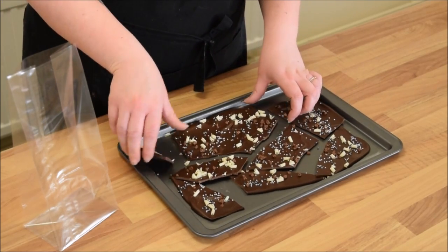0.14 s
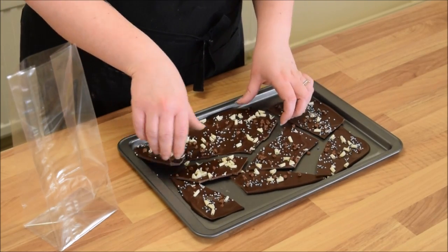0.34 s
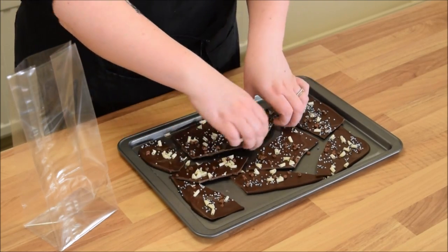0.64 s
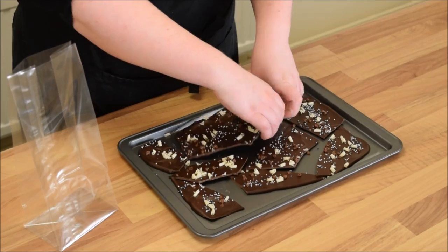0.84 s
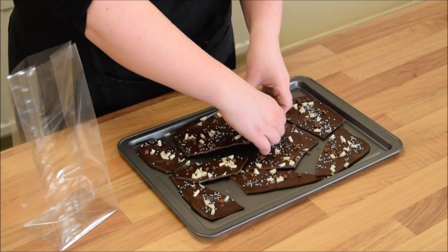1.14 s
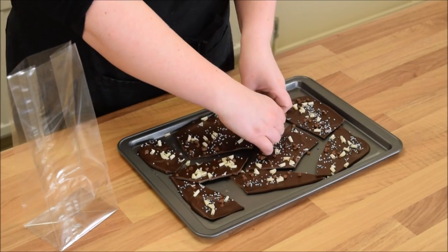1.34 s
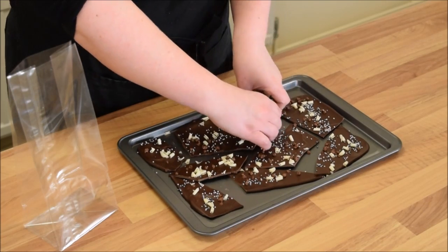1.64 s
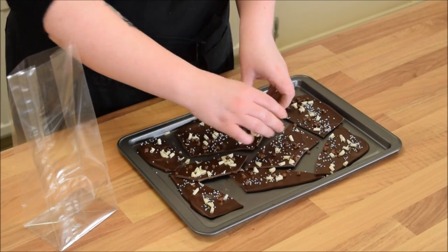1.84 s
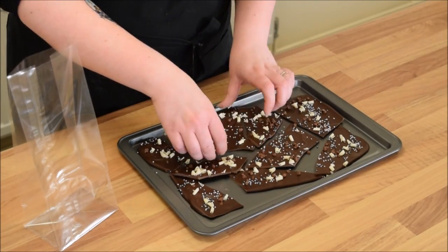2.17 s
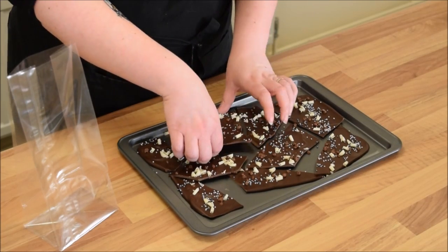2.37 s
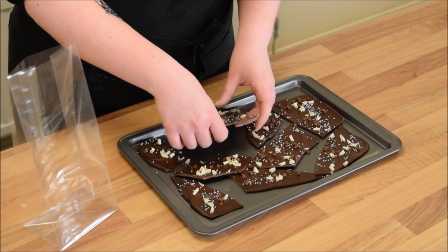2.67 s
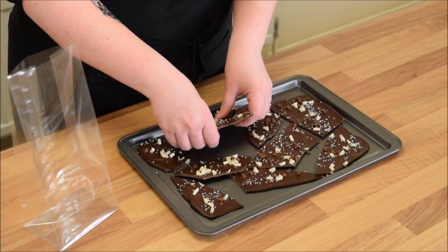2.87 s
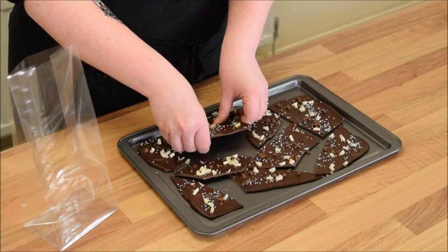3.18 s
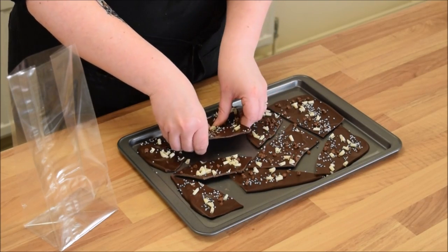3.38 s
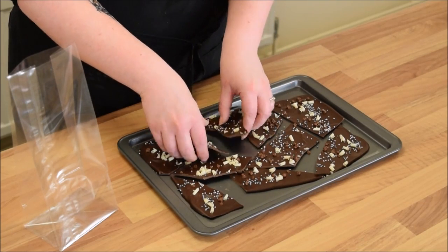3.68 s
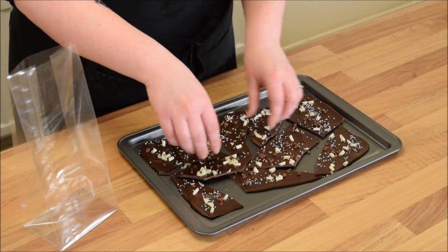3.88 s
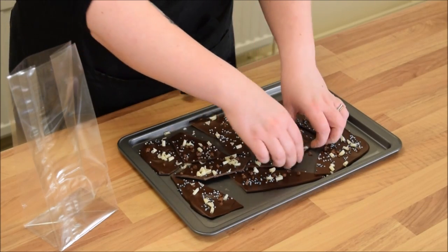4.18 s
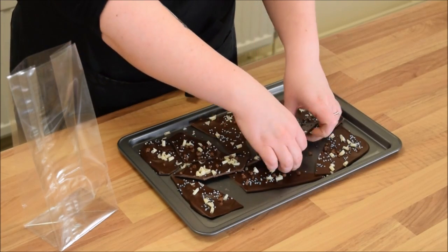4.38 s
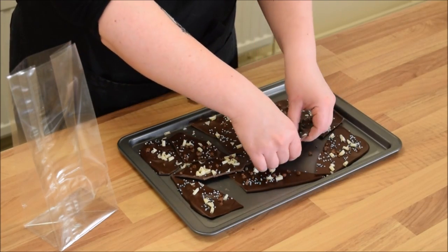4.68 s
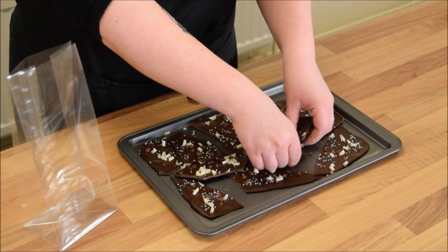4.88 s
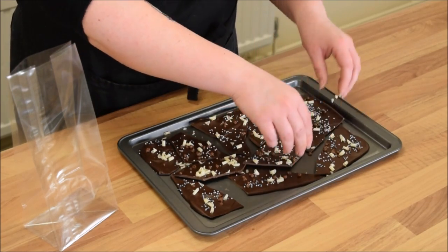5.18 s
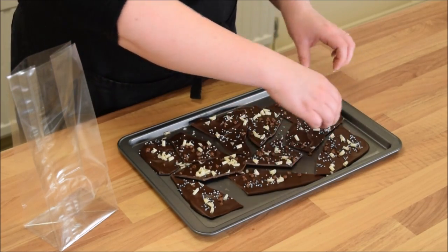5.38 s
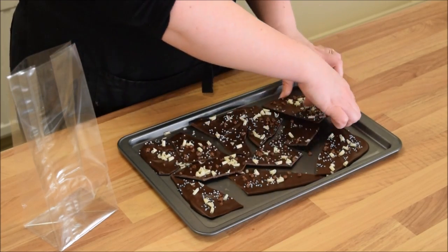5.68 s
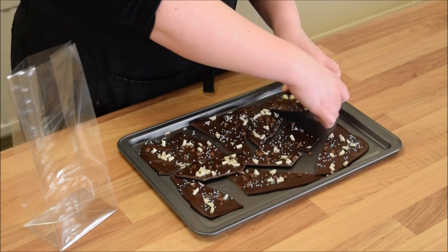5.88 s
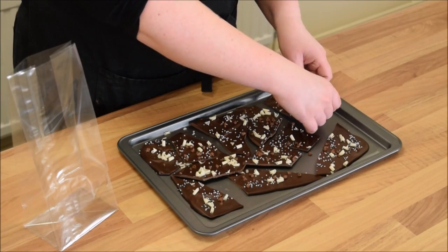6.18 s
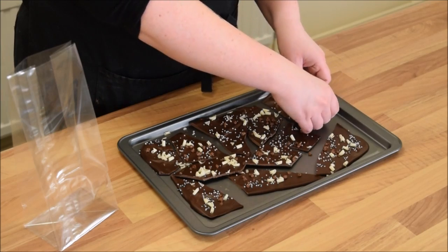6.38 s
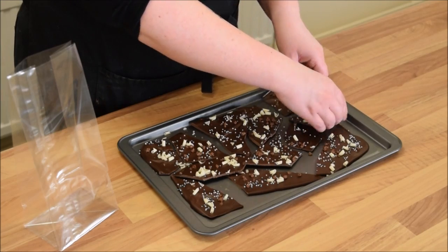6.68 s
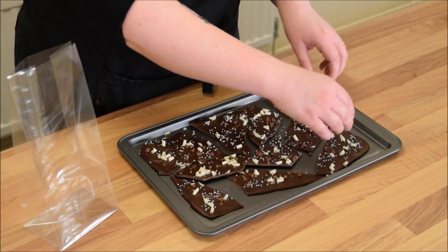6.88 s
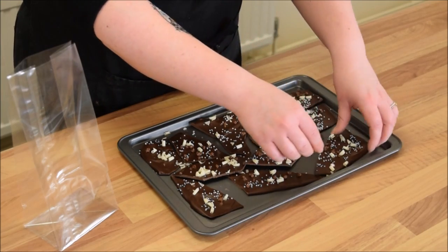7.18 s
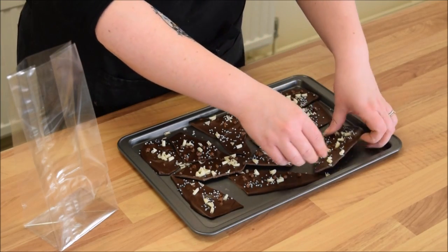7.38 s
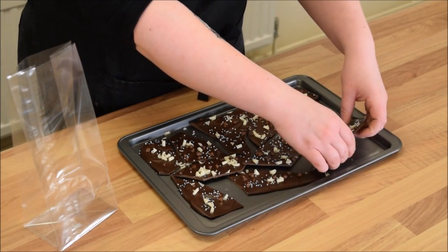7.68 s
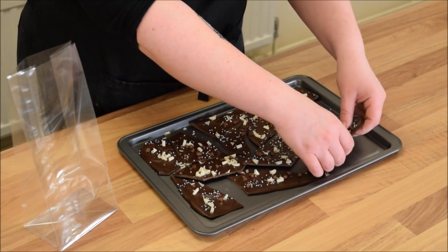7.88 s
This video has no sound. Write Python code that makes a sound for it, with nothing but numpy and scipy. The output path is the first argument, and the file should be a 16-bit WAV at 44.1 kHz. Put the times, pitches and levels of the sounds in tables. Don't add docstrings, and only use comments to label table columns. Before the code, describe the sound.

Hard brittle chocolate pieces snap, clack and knock on a thin metal baking tray in uneven bursts, with crumbs scraping, in a small kitchen.

```python
import sys
import numpy as np
from scipy import signal
from scipy.fft import rfft, irfft
from scipy.io import wavfile

SR = 44100
rng = np.random.default_rng(int(sys.argv[2]) if len(sys.argv) > 2 else 0)


def store_pcm(level_fs):
    pcm = np.round(np.clip(level_fs, -1, 1) * 32767).astype(np.int16)
    wavfile.write(sys.argv[1], SR, np.atleast_2d(pcm).T)


def convert_level_to_amplitude(level_db):
    exponent = np.asarray(level_db, float) / 20
    return 10 ** exponent


N = 354123
RING = 8192


def rms_one(x):
    return x / np.sqrt(np.mean(x ** 2) + 1e-20)


def colour(x, points):
    hz = np.fft.rfftfreq(N, 1 / SR) + 1
    point_hz, point_db = np.transpose(points)
    level_db = np.interp(np.log(hz), np.log(point_hz), point_db)
    return irfft(rfft(x) * convert_level_to_amplitude(level_db), N)


def drift(rate):
    knots = rng.standard_normal(int(N / SR * rate) + 2)
    return np.interp(np.arange(N) / SR * rate, np.arange(len(knots)), knots)


def resonance(f, hz, q):
    return 1 / (1 + 1j * q * (f / hz - hz / f))


def tray_modes(table, events, scatter_db):
    hz, level_db, t60 = np.transpose(table)[:, :, None]
    t = np.arange(RING) / SR
    rings = convert_level_to_amplitude(level_db - 60 * t / t60) * np.sin(2 * np.pi * hz * t)
    strength, sign = rng.standard_normal((2, events, len(table)))
    return rfft((convert_level_to_amplitude(scatter_db * strength) * np.sign(sign)) @ rings)


def all_contacts():
    # start_s, peak_db, thud_db, crack_db, pitch_hz
    snaps = [(0.0572, -28, -13.5, -28, 1980), (0.2651, -10, -21.5, -38, 1970),
             (0.3465, -10.5, -24, -30, 2340), (0.4774, -18.5, -23, -48, 1880),
             (1.5809, -17, -20.5, -34, 3240), (1.5906, -11, -25, -16, 1680),
             (1.9536, -19.5, -16, -29, 2880), (1.9570, -12, -16.5, -31, 1637),
             (2.888, -24.5, -16, -17, 2600), (2.8946, -21.5, -45, -21, 1270), (3.4598, -17, -16, -12, 1590),
             (4.7422, -20.5, -27, -29, 1575), (5.7875, -21, -24, -26, 1700),
             (6.4772, -17, -23, -16.5, 2010), (6.8456, -11.5, -22, -46.5, 1642),
             (6.8953, -18, -26, -33, 1850), (7.48, -28, -31.5, -37, 2400)]
    # start_s, peak_db, thud_db, crack_db, pitch_hz
    drops = [(0.016, -22.5, -44, -28, 1850), (4.9370, -31, -24.5, -29, 2400),
             (3.7885, -18.5, -20, -16, 2280), (5.043, -17.5, -18.5, -27.5, 2050),
             (5.070, -30.5, -8, -39.5, 1470), (5.087, -29.5, -12, -32, 1220), (5.7503, -14, -23, -24, 1900),
             (6.662, -19, -23, -23.5, 1800), (6.7665, -20.5, -17, -39, 1880), (6.8056, -25, -19, -12, 4400),
             (6.9224, -20.5, -20, -19.5, 2780)]
    # start_s, peak_db, crack_db, pitch_hz
    knocks = [(0.0884, -26, -30, 1850), (0.1104, -35, -12, 1960), (0.2439, -40, -27.5, 2670),
              (0.5023, -23, -21.5, 1160), (0.5726, -35, -31, 1300), (0.9178, -32.5, -20.5, 1225),
              (1.2516, -39.5, -28, 2140), (1.277, -43, -26, 2220), (1.3745, -42, -12, 1760),
              (1.7913, -33, -29, 1840), (1.9817, -44, -40, 1550), (2.2079, -26, -31, 1147),
              (2.3785, -31.5, -40, 1900), (2.4763, -35, -28, 1140), (3.8274, -27.5, -31.5, 1640),
              (3.8691, -26, -19, 1750), (3.9122, -38.5, -42, 1550), (4.5925, -44, -10.5, 2270),
              (4.7354, -31.5, -23, 2410), (5.7674, -22, -16, 2110), (6.6923, -31, -18, 3140),
              (6.8259, -36, -29.5, 1120), (7.5353, -31.5, -27, 1778), (7.5582, -32.5, -26, 1680),
              (7.7112, -38.5, -24, 1219)]
    # start_s, peak_db, crack_db, pitch_hz
    ticks = [(0.0054, -35, -24, 3160), (0.6646, -28, -28, 2470), (0.885, -49.5, -4.5, 2600),
             (1.0742, -41, -15, 2300), (1.1549, -38, -24, 2180), (1.4798, -42, -21, 1240),
             (1.7402, -23.5, -21.5, 1760), (2.232, -21.5, -54.5, 1940), (2.3549, -30.5, -24, 1130),
             (3.1643, -26.5, -24, 3050), (3.7335, -34, -23, 3100), (4.0981, -32, -15, 2250),
             (4.181, -38.5, -11, 2260), (4.4202, -29, -15, 2200), (5.2773, -31.5, -12.5, 3480),
             (5.7403, -29, -38, 2300), (7.244, -32.5, -15, 2210), (7.3394, -21.5, -36, 4770),
             (7.355, -27, -26.5, 2000)]
    # start_s, peak_db, crack_db, crumble_ms
    scuffs = [(0.1337, -29.5, -20, 6.5), (0.2206, -44, -24, 22.6), (0.414, -25.5, -23, 15),
              (0.9062, -39.5, -36, 15), (1.366, -39, -30, 5.6), (2.265, -34, -22, 6),
              (2.4685, -36.5, -31, 10.6), (2.5291, -44, -12, 16), (3.6300, -27.5, -23, 21),
              (3.6925, -36, -8.5, 16), (3.7673, -27.5, -33, 25), (3.8138, -23.5, -34, 6),
              (4.077, -49, -25.5, 14), (4.156, -33, -22, 16), (4.2341, -39, -17, 5.3),
              (4.3965, -32.5, -34, 16), (4.9196, -35, -17, 4.8), (5.6181, -36.5, -27, 22),
              (5.6354, -36, -28, 6.4), (5.6627, -40, -23, 17.5), (6.0082, -48.5, -10, 6.5),
              (6.597, -51, -6, 7.7), (6.6267, -37, -29, 6.6), (6.646, -29, -11, 6),
              (7.323, -40.5, -36, 6.2), (7.3755, -39, -30.5, 11), (7.4027, -33.5, -31, 22),
              (7.4353, -32, -32, 12), (7.4505, -31, -22, 25), (7.6917, -36, -33, 9.4)]
    knock_thud_db, tick_thud_db, scuff_thud_db = -15.5, -27, -15
    snap_ms, drop_ms, knock_ms, tick_ms = 3.28, 5, 5, 1.42
    flat_piece_hz = 1640
    rows = [(*row, snap_ms) for row in snaps]
    rows += [(*row, drop_ms) for row in drops]
    rows += [(s, db, knock_thud_db, crack, hz, knock_ms) for s, db, crack, hz in knocks]
    rows += [(s, db, tick_thud_db, crack, hz, tick_ms) for s, db, crack, hz in ticks]
    rows += [(s, db, scuff_thud_db, crack, flat_piece_hz, ms) for s, db, crack, ms in scuffs]
    return rows


def contacts():
    # pitch_hz, level_db, t60_s (time to fall 60 dB)
    tray_low = [(256.6, -11.5, 0.6), (320, -30.5, 0.083), (384.5, 16.5, 0.0728), (427, 10, 0.06),
                (574, -17.5, 0.024), (693.4, 17.5, 0.12), (766, 25.5, 0.025), (877, 16, 0.068)]
    # pitch_hz, level_db, t60_s
    tray_high = [(1030, 3, 0.06), (1228, 2, 0.06), (1530, 2, 0.05), (1680, 3, 0.06), (1780, 1, 0.05),
                 (1994, 3, 0.05), (2277, 4, 0.045), (2610, 0, 0.04), (2850, 2, 0.035), (3140, 5, 0.033),
                 (3980, 0, 0.027), (4320, -3, 0.027)]
    tail = {"thud": (0.22, -42, 0.4, -26), "body": (0.044, -34.5, 0.31, -14.5),
            "crack": (0.0655, -40.5, 0.4, -7.5)}
    s, peak_db, thud_db, crack_db, hz, crumble_ms = np.transpose(all_contacts())[:, :, None]
    count = len(s)
    t, f = np.arange(RING) / SR, np.fft.rfftfreq(RING, 1 / SR) + 1
    grit, burst, scatter_mid, scatter_side = rng.standard_normal((4, count, RING))

    age = 1000 * t / np.clip(crumble_ms, .2, 20)
    crumble = (1 - np.exp(-3.0 * age)) * np.exp(-age)
    drive = grit * convert_level_to_amplitude(7.4 * burst - 19.0) * crumble
    drive[:, 0] += np.exp(-crumble_ms[:, 0] / 6.7)
    strength = np.sqrt(np.sum(drive ** 2, axis=1, keepdims=True))
    build = strength * (1 - np.exp(-t / 0.000087)) * (1 - np.exp(-2.5 * age))
    rattle = convert_level_to_amplitude(3.5 * np.repeat(burst[:, :RING // 32], 32, axis=1))

    def strike(response, layer):
        clutter_t60, room_db, room_t60, side_db = tail[layer]
        clutter = rattle * convert_level_to_amplitude(-30.5 - 60 * t / clutter_t60)
        room = convert_level_to_amplitude(room_db - 60 * t / room_t60)
        fade = build * (clutter + room)
        mid = irfft(rfft(drive + scatter_mid * fade) * response)
        side = irfft(rfft(scatter_side * fade) * response) * convert_level_to_amplitude(side_db)
        return np.array([mid + side, mid - side]) / np.abs(mid).max(axis=1, keepdims=True)

    piece = resonance(f, hz, 2.19) * resonance(f, hz, 0.24)
    piece = piece + convert_level_to_amplitude(-11.0) * resonance(f, 1330, 0.68) * resonance(f, 3230, 1.0)
    body = piece + convert_level_to_amplitude(-56) * tray_modes(tray_high, count, scatter_db=3)
    sheet = resonance(f, 600, .8) + convert_level_to_amplitude(-53) * tray_modes(tray_low, count, scatter_db=3)
    thud = resonance(f, 450, .5) * sheet
    crack = resonance(f, 8000, 1.35) * resonance(f, 11500, 0.9)

    sound = strike(body, "body")
    sound += convert_level_to_amplitude(thud_db + 4.0) * strike(thud, "thud")
    sound -= convert_level_to_amplitude(crack_db + 12.5) * strike(crack, "crack")
    out = np.zeros((2, N + RING))
    for k, at in enumerate((s[:, 0] * SR).astype(int)):
        out[:, at:at + RING] += convert_level_to_amplitude(peak_db[k] - 2.5) * sound[:, k]
    return out[:, :N]


def dying_tones(rows, gain_db, rise_s, t60_at):
    t, out = np.arange(RING) / SR, np.zeros(N + RING)
    for k, (s, db, hz) in enumerate(rows):
        at = int(s * SR)
        envelope = convert_level_to_amplitude(db + gain_db - 60 * t / t60_at(hz)) * (1 - np.exp(-t / rise_s))
        out[at:at + RING] += (-1) ** k * envelope * np.sin(2 * np.pi * hz * t)
    return out[:N]


def pieces_ringing():
    # start_s,
    # peak_db, pitch_hz
    blow_tones = [(0.0575, -31.5, 2290), (0.2649, -27, 4040), (0.2649, -23.5, 4390), (0.2649, -35, 1260),
                  (0.2649, -33, 2615), (0.2649, -34.5, 2254), (0.2649, -25, 2010), (0.3462, -31, 1188),
                  (0.3462, -27, 2578), (0.3462, -27, 1950), (0.3462, -20, 2280), (0.413, -35.5, 1033),
                  (0.413, -30.5, 2240), (0.4777, -32, 1628), (0.4777, -30, 1946), (1.581, -41.5, 4660),
                  (1.581, -30.5, 1473), (1.581, -35.5, 3112), (1.581, -37.5, 2304), (1.581, -33, 4000),
                  (1.581, -32.5, 1780), (1.5905, -31, 4813), (1.5905, -33, 4337), (1.5905, -33, 2830),
                  (1.5905, -29, 3930), (1.5905, -29, 2403), (1.5905, -24, 3150), (1.5905, -32, 1416),
                  (1.5905, -28.5, 1750), (1.9535, -30, 3900), (1.9535, -30, 1040), (1.9535, -26, 2270),
                  (1.9535, -26, 3110), (1.9535, -19.5, 2872), (1.9535, -25, 1556), (2.8878, -39, 1990),
                  (2.8955, -38.5, 1980), (2.8955, -33, 2260), (2.8955, -34, 1206), (3.46, -33, 2870),
                  (3.7887, -35, 4360), (3.7887, -32.5, 1289), (3.827, -42, 1244), (3.827, -38, 1459),
                  (3.827, -30.5, 1651), (5.0426, -33, 1071), (5.75, -39, 4400), (5.75, -40, 1050),
                  (5.75, -44, 3710), (5.75, -30.5, 1810), (5.75, -24.5, 2120), (6.661, -34.5, 1071),
                  (6.661, -37.5, 2840), (6.8456, -33.5, 2729), (6.8456, -28.5, 1100),
                  (6.8456, -27.5, 2235), (6.8456, -31, 1880), (6.895, -39.5, 2820), (6.895, -41, 1740),
                  (6.9215, -35, 3323),
                  (0.0154, -39, 3110), (0.0151, -40, 1690), (0.0147, -37, 1035), (0.063, -37, 2607),
                   (0.0575, -36, 1953), (0.413, -36, 1970), (0.4777, -36, 4000), (0.4774, -35, 4023),
                   (0.4777, -38, 3310), (1.581, -38.5, 3720), (1.739, -36.5, 2900), (1.738, -38, 1658),
                   (1.9535, -30, 4100), (2.8878, -43, 2500), (2.8878, -41, 3300), (3.46, -34, 3387),
                   (3.7887, -45, 3300), (3.7887, -37.5, 4200), (3.7887, -35, 2080), (3.7884, -33.5, 3176),
                   (4.743, -36, 3180), (4.742, -45, 2920), (5.0426, -46, 2100), (5.0438, -34, 2626),
                   (5.043, -33, 3250), (5.0434, -37, 1650), (5.7877, -40.5, 3900), (6.478, -40, 1100),
                   (6.478, -38, 1700), (6.475, -40, 2198), (6.661, -35.5, 3443), (6.661, -38, 3180),
                   (6.661, -32, 2017), (6.8456, -32, 4780), (6.894, -40, 1095), (6.9215, -40, 1108),
                   (6.9215, -38, 2880)]
    # start_s, peak_db,
    # pitch_hz
    chips = [(0.0082, -42.5, 2900), (0.011, -43, 1720), (0.0612, -18.5, 2370), (0.0648, -32.5, 2240),
             (0.0889, -31, 3190), (0.265, -3.5, 2330), (0.2948, -29.5, 2240), (0.302, -25, 2200),
             (0.3169, -31, 2200), (0.3525, -14, 2260), (0.3582, -23.5, 1590), (0.5095, -22, 1850),
             (0.5757, -29, 1670), (1.5813, -18, 3400), (1.5921, -21, 1870), (1.6029, -32.5, 1720),
             (1.6104, -22, 1670), (5.755, -16, 2100), (1.6365, -28.5, 1590), (1.6454, -32, 2280),
             (1.7479, -36.5, 2240), (1.9642, -30.5, 1550), (1.9842, -21.5, 1450), (1.9911, -30.5, 1810),
             (4.102, -33, 2200), (7.2475, -32, 2500), (2.2344, -28.5, 2100), (4.4235, -29, 2300),
             (2.3609, -31, 1770), (2.3779, -35, 2580), (2.9008, -25, 1590), (2.9048, -27, 1530),
             (2.9077, -34.5, 2370), (3.4665, -27.5, 1740), (3.4789, -31, 1980), (4.4035, -35, 2500),
             (3.8043, -25, 2630), (3.706, -34, 3000), (3.8451, -41, 1890), (3.8722, -40, 2020),
             (4.9197, -43, 2450), (5.0492, -17, 1990), (5.7409, -33.5, 2710), (5.7706, -30.5, 2070),
             (5.7823, -31, 2110), (5.7887, -23, 2630), (5.8057, -31.5, 1160), (6.6759, -19.5, 1720),
             (6.6898, -22, 1850), (6.777, -21, 2020), (6.8086, -29.5, 4310), (6.8265, -24, 1520),
             (6.8956, -21, 1900), (6.8988, -22, 3000), (6.9132, -25, 1940), (6.916, -26, 1980),
             (6.9202, -35, 2330), (7.3404, -17.5, 5470), (7.4032, -31, 2500), (7.4059, -28, 2500),
             (0.0195, -25, 1360), (0.422, -28, 2200), (0.2652, -18, 1310), (0.372, -24, 1120),
                 (0.5114, -32, 4110), (1.5807, -25.5, 1690), (1.5902, -25, 1690), (1.632, -41.5, 4390),
                 (1.7617, -46, 3880), (1.9838, -40.5, 3320), (2.4711, -37, 750), (2.887, -31.5, 1055),
                 (2.8965, -19, 1280), (3.167, -33, 1370), (3.6415, -30, 3000), (3.6473, -32, 3300),
                 (3.694, -32, 3600), (3.8031, -33.5, 3750), (5.0746, -28.5, 1160), (5.1236, -36, 1100),
                 (5.77, -34, 3510), (5.7828, -26, 1030), (5.7883, -27, 3620), (6.4772, -20, 4000),
                 (6.481, -24, 4300), (6.5024, -36.5, 4130), (6.645, -41, 1100), (6.6478, -40.5, 4390),
                 (6.6893, -39.5, 3340), (6.7861, -37.5, 4050), (6.9158, -32, 4440), (6.9229, -29.5, 3320),
                 (6.9316, -30, 3490), (6.9416, -33.5, 4010), (7.34, -30, 5660), (7.3558, -32, 4950),
                 (7.4627, -45.0, 4130),
             (0.573, -27, 1300),
        (1.5906, -14, 3600),
        (1.9572, -13, 2430),
        (6.4746, -20, 1800),
        (6.849, -13, 2100),
    ]

    def tone_t60(hz):
        return 0.093 * (2000 / hz) ** 0.74

    def chip_t60(hz):
        return 7 / hz

    tones = dying_tones(blow_tones, -1, 0.00065, tone_t60)
    clicks = dying_tones(chips, 0.5, 0.00008, chip_t60)
    return tones + clicks


def tray_rings():
    # start_s, peak_db, pitch_hz
    drop_rings = [(0.057, -25.5, 910), (0.145, -27.5, 620.4), (0.266, -20, 843), (0.347, -22, 853),
                  (0.412, -32, 905), (0.477, -26, 872), (0.502, -33, 862), (1.589, -34.5, 715),
                  (1.955, -41, 718), (1.981, -38.5, 377.3), (2.23, -33, 743.6), (2.475, -37.5, 745),
                  (3.46, -21.5, 685), (3.635, -25, 713), (3.828, -30, 877), (4.742, -31.5, 571.6),
                  (3.633, -31.5, 333.6), (5.751, -38, 908), (6.477, -51, 890), (6.661, -24.5, 750),
                  (6.846, -32, 730), (6.922, -35, 894), (7.447, -33, 394), (7.479, -32.5, 693)]
    # start_s, peak_db
    flexes = [(0.091, -56), (0.135, -39.5), (0.262, -42.5), (0.344, -42), (0.419, -58), (0.501, -55),
              (1.954, -45), (2.899, -51), (3.47, -45), (3.787, -59), (5.043, -65), (6.301, -53),
              (6.845, -65)]
    ring_t60_s, sheet_t60_s = 0.0933, 0.63
    sheet_hz = 256.6
    rows = [(*row, ring_t60_s) for row in drop_rings]
    rows += [(s, db, sheet_hz, sheet_t60_s) for s, db in flexes]
    t, out = np.arange(RING * 2) / SR, np.zeros(N + RING * 2)
    for s, db, hz, t60 in rows:
        at = int(s * SR)
        envelope = convert_level_to_amplitude(db - 8.5 - 60 * t / t60) * (1 - np.exp(-t / 0.0028))
        out[at:at + len(t)] += envelope * np.sin(2 * np.pi * hz * t)
    return out[:N]


def slide():
    # start_s, length_s, level_db
    strokes = [(0.0, 0.15, -54), (0.441, 0.021, -55), (0.742, 0.149, -68), (1.791, 0.0126, -59),
               (2.477, 0.048, -64), (3.657, 0.221, -58), (3.947, 0.344, -69.5), (4.99, 0.077, -57),
               (5.198, 0.33, -69), (5.562, 0.383, -63.5), (6.006, 0.15, -68), (6.47, 0.213, -62.5),
               (6.797, 0.13, -50.5), (7.145, 0.19, -66.5), (7.394, 0.045, -63.5), (7.7, 0.25, -70.5)]
    # pitch_hz, level_db (per Hz)
    crumb_colour = [(300, 3.5), (900, 6.5), (2000, 3.5), (4000, -4.5), (6000, -15.5), (9000, -10),
                    (15000, -49)]
    rise_db_per_s, fall_db_per_s = 121, 94
    t, level_db = np.arange(N) / SR, np.full(N, -100.)
    for s, length, db in strokes:
        before, after = np.maximum(s - t, 0), np.maximum(t - s - length, 0)
        level_db = np.maximum(level_db, db - rise_db_per_s * before - fall_db_per_s * after)
    clicks = convert_level_to_amplitude(3.8 * rng.standard_normal(N) + 3 * drift(40))
    mid, side = rng.standard_normal((2, N)) * clicks
    stereo = mid + convert_level_to_amplitude(-28.0) * side * [[1], [-1]]
    return convert_level_to_amplitude(level_db + 6.0) * rms_one(colour(stereo, crumb_colour))


def kitchen(x):
    # delay_ms, level_db
    echoes = [(3.3, -14), (6.5, -36), (10.6, -15), (18.4, -23.5)]
    out = x.copy()
    for ms, db in echoes:
        lag = round(ms * SR / 1000)
        out[:, lag:] += convert_level_to_amplitude(db + np.array([[-.6], [.6]])) * x[:, :-lag]
    return signal.sosfilt(signal.butter(3, [190, 10500], "band", fs=SR, output="sos"), out)


def room_tone():
    # pitch_hz, level_db (per Hz)
    air_colour = [(15, -61.5), (25, -24), (70, -7), (120, -6), (155, -10.5), (195, -2), (242, -2.5),
                  (293, -5), (531, -5), (575, -6), (1040, -2.5), (1790, -8.5), (2280, -11.5), (2990, -10),
                  (3250, -16.5), (6740, -24.5), (16000, -34)]
    # pitch_hz, side_db (side minus mid)
    air_width = [(60, -27.5), (110, -16.5), (200, -16), (380, -9), (700, -7.5), (1290, -9), (2380, 0.5),
                 (4400, -0.5), (8120, -1), (15000, -3)]
    # pitch_hz, level_db (rms)
    hum_tones = [(247.6, -74.5), (543.7, -73), (812, -72), (2256, -67.5), (2950, -74), (4511, -83),
                 (6584, -84), (6767, -90)]
    mid, side = rng.standard_normal((2, N))
    stereo = mid + colour(side, air_width) * [[1], [-1]]
    air = rms_one(colour(stereo, air_colour))
    t, hum = np.arange(N) / SR, np.zeros(N)
    for hz, db in hum_tones:
        waver = convert_level_to_amplitude(db + 3 + 1.5 * drift(6))
        hum += waver * np.sin(2 * np.pi * hz * t + .3 * drift(4))
    return convert_level_to_amplitude(-54.5 + .4 * drift(3)) * air + hum


def traffic():
    # rumble_db, first_drone_db, second_drone_db
    far_db = [-64.5, -86.5, -91]
    # start_s, hold_s, rumble_db, first_drone_db, second_drone_db
    swells = [
        (0.0, 0.16, -57, -62.5, -76.5),
        (0.33, 0.2, -55, -86.5, -75),
        (0.797, 0.046, -64, -64, -72),
        (3.6, 0.117, -61.5, -69, -82),
        (6.77, 0.192, -57, -55.5, -58),
        (7.048, 0.23, -63.5, -53.5, -58.5),
        (7.42, 0.052, -67, -59.5, -64),
        (7.62, 0.31, -59, -73, -63),
        (7.92, 0.113, -58.5, -57, -72),
    ]
    # time_s, rate_hz
    engine = [
        (0, 63.8),
        (6.3, 67.3),
        (7.4, 69.81),
        (7.6, 75.7),
        (8.03, 74.1),
    ]
    t = np.arange(N) / SR
    level_db = np.array([db + 2.0 * drift(2.26) for db in far_db])
    for s, hold, *top_db in swells:
        away_s = np.maximum(np.maximum(s - t, t - s - hold), 0)
        level_db = np.maximum(level_db, np.array(top_db)[:, None] - 72.5 * away_s)
    rumble_db, first_db, second_db = level_db
    low = signal.butter(2, [95, 135], "band", fs=SR, output="sos")
    rumble = rms_one(signal.sosfilt(low, rng.standard_normal(N)))
    firing_hz = np.interp(t, *np.transpose(engine)) + 0.54 * drift(3.4)
    turn = 2 * np.pi * np.cumsum(firing_hz) / SR
    first_db = first_db + 3.5 * drift(9) - 1.5
    second_db = second_db + 3.5 * drift(12) - 1.5
    first = convert_level_to_amplitude(first_db - 7.0) * np.sin(turn)
    second = convert_level_to_amplitude(second_db - 1.0) * np.sin(2.1 * turn)
    return convert_level_to_amplitude(rumble_db - 9.0) * rumble + first + second


def scene():
    tray = kitchen(contacts() + tray_rings() + pieces_ringing() + slide())
    right_louder_db = 0.4
    balance = convert_level_to_amplitude([[-right_louder_db / 2], [right_louder_db / 2]])
    return (tray + room_tone() + traffic()) * balance


def top_cut(x):
    return signal.sosfilt(signal.butter(12, 15900, fs=SR, output="sos"), x)


def record(dry):
    top = signal.cheby2(10, 60, 17200, fs=SR, output="sos")
    mix = signal.sosfilt(top, dry)
    return top_cut(mix)


dry = scene()
out = record(dry)
store_pcm(out)
```